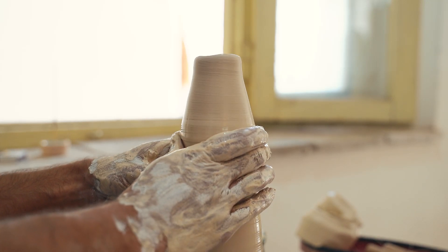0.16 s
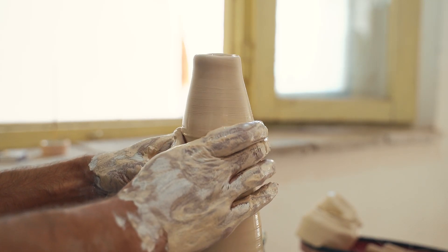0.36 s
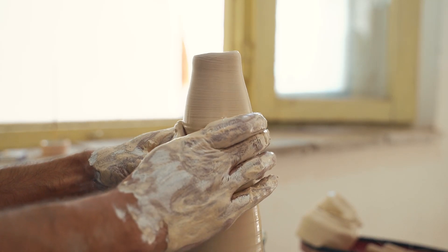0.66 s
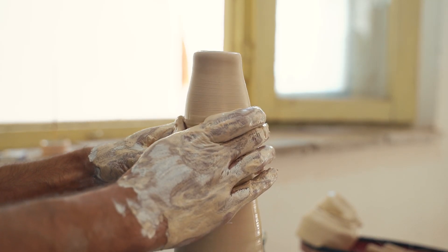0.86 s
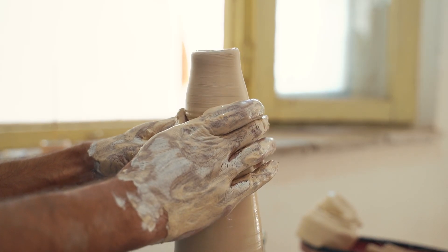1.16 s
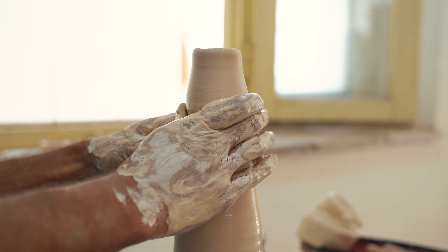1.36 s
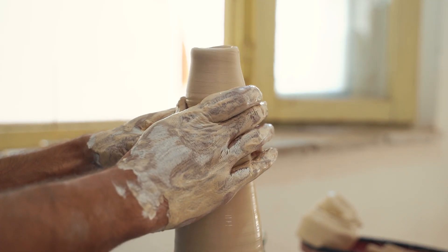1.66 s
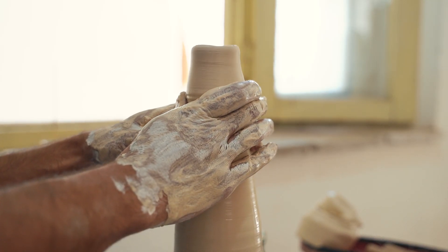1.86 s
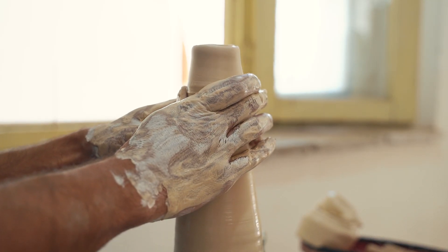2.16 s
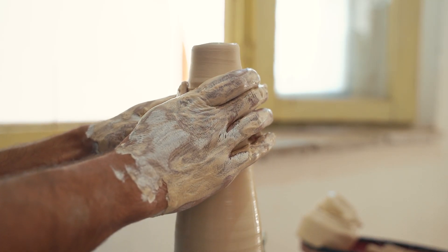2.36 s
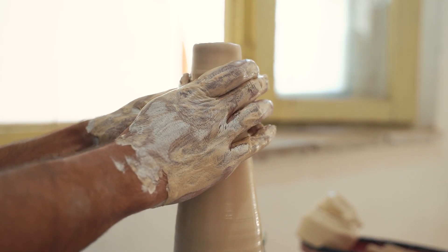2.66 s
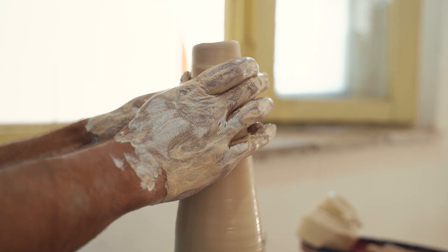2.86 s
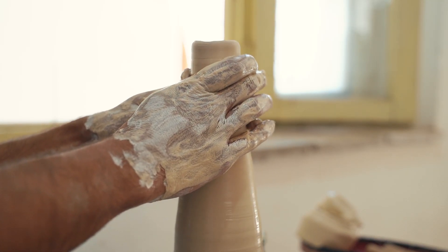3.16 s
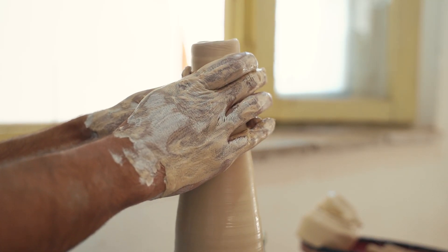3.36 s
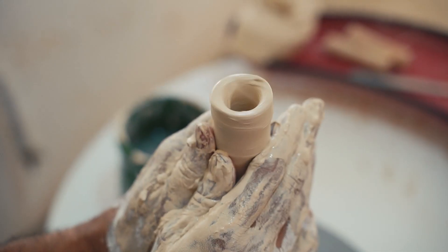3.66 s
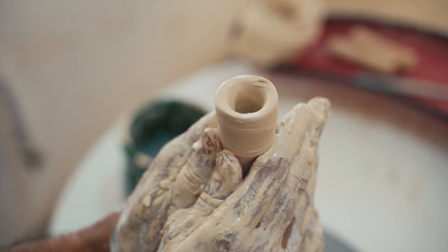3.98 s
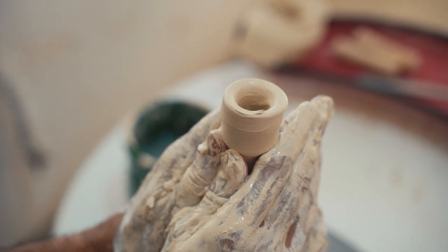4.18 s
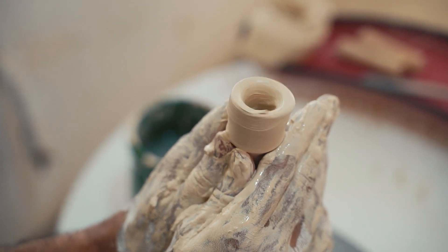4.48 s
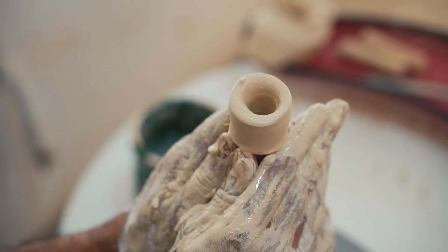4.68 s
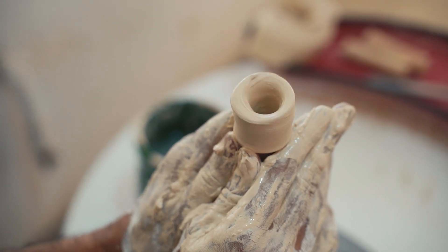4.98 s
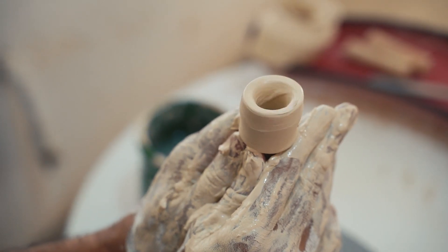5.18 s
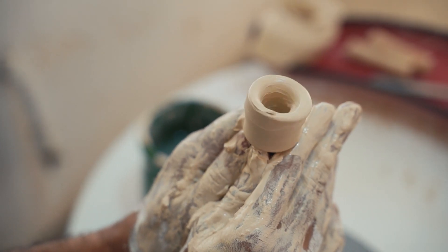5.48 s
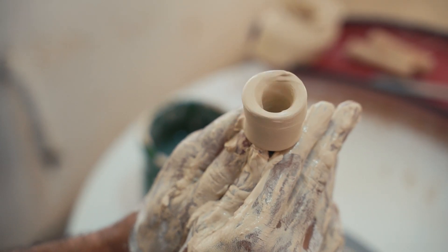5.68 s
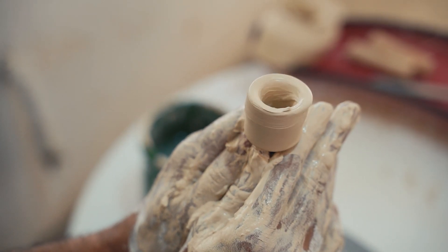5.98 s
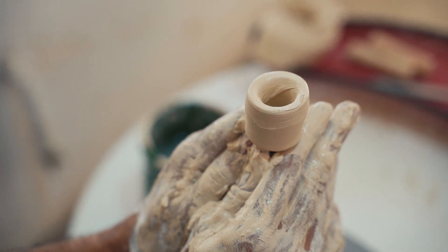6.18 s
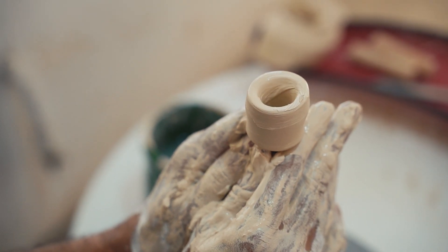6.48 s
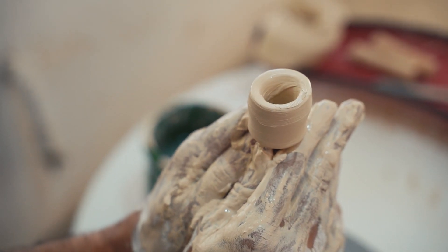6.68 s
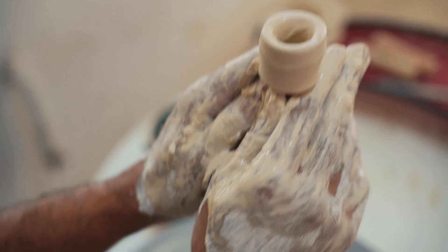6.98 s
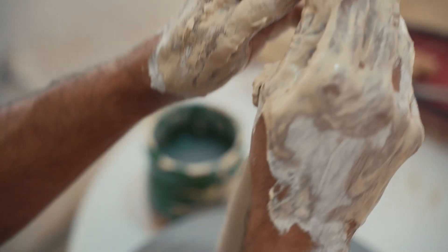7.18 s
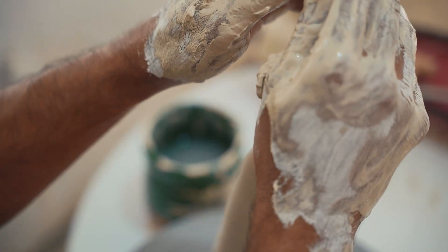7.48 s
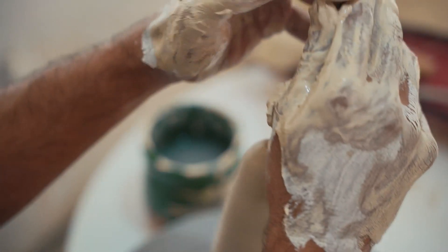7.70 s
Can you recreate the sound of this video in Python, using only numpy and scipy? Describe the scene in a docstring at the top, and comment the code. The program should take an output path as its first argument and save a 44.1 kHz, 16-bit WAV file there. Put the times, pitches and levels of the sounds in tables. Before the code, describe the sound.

A close stereo perspective in a small studio presents an electric pottery wheel running without pause. From 0 to 3 seconds, a low motor hum throbs unevenly over rushing bearings, soft hiss, faint thin whistles and a very high, trembling controller whine. Wet palms brush the clay near 0.25, 0.7 and 1 second; tiny belt chirps occur around 1.15 and 1.4, and soft taps cluster around 1.6 and 2.6. Between 3 and 4 seconds, it dissolves into a faster wheel: the main hum drops lower, bearing noise grows fuller, and a rough mid-pitched belt note rises sharply around 3.5. That note swells and slackens slowly, roughly every 1.3 seconds. A deep, faint drone strengthens near 5.7. Small wet smacks with brief room tails come around 6.2 to 6.8, then hum and whine continue to the end near 7.8.

```python
"""A motor hum fills a small studio as an electric pottery wheel turns under wet hands on clay.
Hums throb through the frame, bearing noise rushes, the belt sings and the speed controller whines near 8 kHz.
A slowly turning wheel dissolves into a faster one, whose hum sits on a lower frame resonance.
Tones are fluttering sines, while rush, hiss, sliding palms, soft taps and wet smacks are shaped noise."""
import sys
import numpy as np
from scipy.fft import rfft, irfft, next_fast_len
from scipy.io import wavfile
from scipy.ndimage import map_coordinates

SR = 44100
rng = np.random.default_rng(int(sys.argv[2]) if len(sys.argv) > 2 else 0)


def wrap_up_sound(samples):
    """Save the sound to the file named by the first command line argument, as 16-bit audio."""
    columns = np.atleast_2d(samples).T
    # keep every value between -1 and 1, then stretch to whole-number steps
    tamed = np.clip(columns, -1, 1)
    steps = np.round(tamed * 32767).astype(np.int16)
    wavfile.write(sys.argv[1], SR, steps)


N = 345744

# Frame hums at slow and fast speed, and the low drone of the stand.
# Each row: time in seconds, level in dB before a small trim.
SLOW_HUM_CURVE = [(0.0, -37.5), (0.09, -30.5), (0.62, -37), (0.67, -45), (0.91, -31.5), (1.39, -33),
                  (1.41, -39.5), (1.65, -29.5), (1.7, -42), (1.88, -27), (2.0, -38.5), (2.1, -30),
                  (2.62, -37), (2.83, -29), (3.14, -46), (3.18, -36), (3.33, -45), (3.37, -36), (3.73, -43),
                  (3.75, -53)]
FAST_HUM_CURVE = [(3.3, -58), (3.62, -39), (3.84, -34), (4.09, -45), (4.55, -33), (4.89, -38), (5.13, -32),
                  (5.19, -48), (5.4, -36), (5.57, -48), (5.83, -33), (6.24, -42.5), (6.36, -35.5),
                  (6.5, -60), (6.66, -38), (7.8, -32)]
DRONE_CURVE = [(0.0, -60), (0.04, -50), (0.41, -46), (1.99, -60), (5.74, -41), (6.62, -52), (6.99, -44),
               (7.71, -59), (7.84, -48)]
SLOW_HUM_HZ, FAST_HUM_HZ, DRONE_HZ = 180, 120, 43.8  # pitches at their usual level
SAG_PER_DB = 0.0046  # share of its pitch a hum loses per dB of swell
HUM_FADE_S = 0.08  # fade in and out, outside the first and last points of the curve

# Weaker tones: motor orders, and a faint hum at 100 and 200 Hz. Each row: pitch in Hz, level in dB (at fast
# speed only the balance counts).
SLOW_MOTOR_TONES = [(57, -68), (85, -54), (100, -54), (114, -54), (171, -45.5), (199, -52), (220, -64),
                    (240, -55), (261, -57), (490, -65.5), (610, -58.5), (661, -56)]
FAST_MOTOR_TONES = [(100, -49.5), (160, -46), (180, -48.5), (200, -41.5), (220, -54.5), (239, -50.5),
                    (259, -49), (268, -53.5), (355, -56.5), (373, -54), (460, -62.5), (483, -57.5),
                    (665, -54), (818, -53), (842, -57.5), (865, -55.5)]
# Swell of the fast motor tones as the hands press. Each row: time in seconds, level in dB before a trim.
HAND_LOAD = [(4.0, -41), (4.55, -38), (4.95, -42), (5.95, -39.5), (6.15, -43), (7.15, -39), (7.5, -36),
             (7.84, -42.5)]

# Colour of the belt and bearing noise. Each row: frequency in Hz, relative density in dB per Hz.
SLOW_RUSH_COLOUR = [(20, -16), (42, -3), (80, -0.5), (150, -1.5), (250, -2), (320, -5.5), (480, -5.5),
                    (540, -7.5), (650, 0), (740, -11), (830, -6), (1150, -16), (3000, -21), (7000, -40.5)]
FAST_RUSH_COLOUR = [(20, -16), (60, -1.5), (140, -2), (260, 0), (320, -6), (490, -4.5), (540, -8),
                    (650, 5.5), (745, -5), (840, 0), (930, -6.5), (1080, -17), (3000, -20.5), (6000, -45)]
SLOW_BEARINGS_DB, FAST_BEARINGS_DB = -43.5, -40.5  # middle levels, about which the noise wavers

# Thin high whistles of the drive. Each row: centre in Hz, width in Hz, level in dB.
SLOW_WHISTLE_BANDS = [(2510, 140, -61), (12000, 110, -73), (12700, 90, -71)]
FAST_WHISTLE_BANDS = [(2220, 130, -64.5), (2500, 116, -59.5), (2744, 40, -69.5), (3160, 90, -67.5),
                      (13250, 140, -72), (15700, 220, -66.5)]

# Colour of the steady hiss. Each row: frequency in Hz, relative density in dB per Hz.
HISS_COLOUR = [(300, -9), (2000, -6.5), (4500, 5), (7000, 1.5), (9300, -5.5), (11000, -0.5), (15000, -4.5),
               (15700, -1.5)]

# Belt chirps as it slips. Each row: centre in seconds, length in seconds, rise in dB.
BELT_CHIRPS = [(1.15, .07, 8), (1.425, .07, 11), (3.99, .09, 4), (6.2, .12, 4)]
TURN_HZ, TIGHT_S = 0.76, 3.78  # the belt's load cycle: its rate, and a moment when it is tightest
BELT_GRIP = 2.1  # how squarely the belt switches between tight and slack
BELT_RISE_S, BELT_RISE_LENGTH_S = 3.52, 0.089  # middle and length of the belt note's rise from faint to loud
BELT_SLOW_DB, BELT_EASE_DB_PER_S = -50, 1.6  # slow belt: level at the start, and how fast it eases off
BELT_FAST_DB, BELT_SWING_DB = -39.8, 3.2  # fast belt: middle level, and swing up or down with tension

# Sidebands of the controller whine. Each row: multiple of the drive frequency off the carrier,
# relative left level in dB, relative right level in dB, left-right likeness from -1 to 1.
SLOW_SIDEBANDS = [(-25, -71, -66, 0.5), (-20, -67, -60, 0.2), (-14, -48, -45, 0.9), (-10, -50, -49, -0.8),
                  (-8, -63, -59, -0.2), (-3, -57, -47, -0.5), (-1, -47, -50, -0.4), (1, -52, -42, 0.8),
                  (3, -52, -51, -0.6), (8, -63, -52, 0.3), (10, -52, -54, 0.5), (14, -50, -52, 0.2),
                  (16, -65, -63, -0.1), (24, -71, -68, 0.2)]
FAST_SIDEBANDS = [(-22, -66, -63, 0.5), (-20, -56, -55, -0.1), (-16, -58, -56, 0.3), (-14, -44, -47, 0.4),
                  (-10, -53, -47, 0.6), (-8, -55, -50, 0.2), (-3, -52, -52, 0.2), (-1, -44, -43, -0.2),
                  (1, -44, -47, -0.4), (3, -52, -50, 0.1), (5, -58, -53, 0.4), (8, -56, -53, -0.1),
                  (10, -47, -44, -0.9), (14, -47, -49, -0.0), (16, -62, -53, 0.1), (23, -67, -61, -0.2)]
# Strength of the whine. Each row: time in seconds, level in dB before a trim.
WHINE_CURVE = [(0.0, -41.5), (1.05, -40.5), (3.36, -42), (3.38, -44.5), (4.11, -37.5), (7.58, -40.5),
               (7.84, -36.5)]
CARRIER_HZ = 8139  # switching frequency of the speed controller
SLOW_HZ, FAST_HZ = 13.87, 19.6  # drive frequency of the motor at each speed

# Wet palms sliding on clay. Each row: centre in seconds, length in seconds, level in dB.
PALM_SLIDES = [(.25, 0.45, -50.5), (0.702, 0.15, -50.5), (1.04, .13, -51.5)]

# Soft taps and wet smacks. Each row: start in seconds, level in dB before a 3 dB lift, ring in Hz.
TAP_EVENTS = [(.259, -44, 3250), (.8, -52, 1500), (1.04, -48, 1050), (1.547, -51.5, 3500),
              (1.604, -42.5, 1860), (1.639, -47, 1200), (1.7, -48, 1190), (2.565, -56, 4600),
              (2.598, -48.5, 1550), (2.639, -51, 1050), (3.115, -53, 5550), (3.51, -54, 4900),
              (3.691, -52, 1300), (6.196, -54, 4500), (6.419, -43.5, 2900), (6.434, -44.5, 2470),
              (6.55, -41, 1600), (6.808, -42, 1600)]
# Colour of a tap about its ring. Each row: distance in octaves, relative level in dB.
TAP_SPECTRUM = [(-6, -19), (-1, 4), (0, 6.5), (1, -5), (1.7, -17.5), (7, -35)]

# Left-right likeness of the noise. Each row: frequency in Hz, likeness from 0 to 1.
STEREO_LIKENESS = [(150, 1), (350, 0.86), (700, 0.65), (1400, 0.28), (3000, 0), (12000, 0.08)]


def amp(db):
    """Decibels to gain."""
    return 10 ** (np.asarray(db) / 20)


def unit(x):
    """Scale to rms 1."""
    return x / np.sqrt(np.mean(np.abs(x) ** 2) + 1e-20)


def clock():
    """Time of every sample in seconds."""
    return np.arange(N) / SR


def along(points, hz):
    """Read (Hz, value) points on a log frequency axis."""
    f, value = np.transpose(points)
    return np.interp(np.log(hz + 1), np.log(f + 1), value)


def curves(rows):
    """One value per sample for each column after the time."""
    s, *columns = np.transpose(rows)
    return [np.interp(clock(), s, column) for column in columns]


def wobble(rate):
    """A smooth random curve with rate knots a second."""
    coarse = clock()[::64]
    knots = rng.standard_normal(2048)
    smooth = map_coordinates(knots, [coarse * rate], mode="wrap")
    return np.interp(clock(), coarse, smooth)


def turning(hz):
    """Phase of a vibration with a fixed or moving frequency, from a random start."""
    return 2 * np.pi * (np.cumsum(hz * np.ones(N)) / SR + rng.random())


def tone(phase, rough, rate):
    """A sine of rms near 1, of which the share rough flutters in level and phase."""
    rough = np.clip(rough, 0, 1)
    steady, loose = np.sqrt(2 * (1 - rough)), np.sqrt(rough)
    in_phase = (steady + loose * wobble(rate)) * np.sin(phase)
    return in_phase + loose * wobble(rate) * np.cos(phase)


def filtered(x, response):
    """Shape the spectrum of x by a response of frequency."""
    m = next_fast_len(N + 8192, real=True)
    spectrum = rfft(x, m) * response(np.fft.rfftfreq(m, 1 / SR))
    return irfft(spectrum, m)[..., :N]


def noise(gain):
    """Coloured stereo noise of rms 1: mono in the bass, diffuse in the treble."""
    def mid_side_gain(hz):
        # this split of power between mid and side gives the wanted likeness
        angle = np.arccos(np.clip(along(STEREO_LIKENESS, hz), -1, 1)) / 2
        return gain(hz) * [np.cos(angle), np.sin(angle)]

    mid, side = filtered(rng.standard_normal((2, N)), mid_side_gain)
    return unit(np.array([mid + side, mid - side]))


def rush(spectrum):
    """Stereo noise of rms 1 with a (Hz, dB) spectrum."""
    return noise(lambda hz: amp(along(spectrum, hz)))


def frame_hum(rows, hz, gain_db, wander_hz, throb_db, rough, flutter_rate):
    """A motor order on a frame resonance throbs, and sags in pitch as it swells."""
    db, = curves(rows)
    from_edge = np.minimum(clock() - rows[0][0], rows[-1][0] - clock())
    present = np.clip(1 + from_edge / HUM_FADE_S, 0, 1)
    usual_db = np.average(db, weights=present * amp(db) ** 2)
    db = db + throb_db * wobble(11)
    pitch = hz * (1 - SAG_PER_DB * (db - usual_db)) + wander_hz * wobble(4)
    return present * amp(db + gain_db) * tone(turning(pitch), rough, flutter_rate)


def slow_wheel():
    """Bearing noise, motor tones, whistles and hiss at slow speed."""
    bearings = amp(SLOW_BEARINGS_DB + 1.4 * wobble(7.78)) * rush(SLOW_RUSH_COLOUR)
    tones = motor_tones(SLOW_MOTOR_TONES, rough=0.67, flutter_rate=12)
    hiss = amp(-54.5) * rush(HISS_COLOUR)
    return bearings + tones + whistles(SLOW_WHISTLE_BANDS) + hiss


def fast_wheel():
    """The same parts at fast speed; the motor tones swell with the pressure of the hands."""
    tones_db, = curves(HAND_LOAD)
    bearings = amp(FAST_BEARINGS_DB + 1.1 * wobble(12)) * rush(FAST_RUSH_COLOUR)
    tones = unit(motor_tones(FAST_MOTOR_TONES, rough=0.28, flutter_rate=8))
    tones = amp(tones_db + 0.96 + 0.7 * wobble(6)) * tones
    hiss = amp(-54) * rush(HISS_COLOUR)
    return bearings + tones + whistles(FAST_WHISTLE_BANDS) + hiss


def motor_tones(tones, rough, flutter_rate):
    """Weak tones whose pitches waver together as the hands load the wheel."""
    load = np.cumsum(1 + 0.0029 * wobble(5)) / SR  # time that runs slightly fast or slow
    return sum(amp(db) * tone(2 * np.pi * hz * load, rough, flutter_rate) for hz, db in tones)


def whistles(bands):
    """Noise in narrow resonances, fluttering together in level."""
    def resonances(f):
        return sum(amp(db) / np.sqrt(width) / (1 + (2 * (f - hz) / width) ** 2) for hz, width, db in bands)

    level = np.linalg.norm([amp(db) for hz, width, db in bands])
    flutter = amp(1.1 * wobble(8.1) + 1.7 * wobble(35))
    return level * flutter * noise(resonances)


def belt(hz, rough, flutter_rate, unrest_db):
    """The belt sings a rough note: faint with the slow wheel, louder and swelling with tension with the fast."""
    loud = np.clip(0.5 + (clock() - BELT_RISE_S) / BELT_RISE_LENGTH_S, 0, 1)
    slow_db = BELT_SLOW_DB - BELT_EASE_DB_PER_S * clock()
    fast_db = BELT_FAST_DB + BELT_SWING_DB * tension()
    slip_db = sum(rise * np.exp(-(2 * (clock() - s) / length) ** 2) for s, length, rise in BELT_CHIRPS)
    db = (1 - loud) * slow_db + loud * fast_db + slip_db + unrest_db * wobble(14)
    phase = turning(hz + 2.546 * wobble(8))
    # a fully fluttering copy in each ear widens the note
    spread = np.array([tone(phase, 1, flutter_rate), tone(phase, 1, flutter_rate)])
    return amp(db) * (tone(phase, rough, flutter_rate) + amp(-13.5) * spread)


def tension():
    """The belt tightens (towards 1) and slackens (towards -1) in a slow, even cycle."""
    return np.tanh(BELT_GRIP * np.cos(2 * np.pi * TURN_HZ * (clock() - TIGHT_S)))


def controller(fast):
    """The whine spreads wider at the higher drive frequency, and trembles slightly in level."""
    slow_whine = whine(SLOW_HZ, SLOW_SIDEBANDS, rough=0.12, flutter_rate=24, halo_db=-51, halo_width_hz=290)
    fast_whine = whine(FAST_HZ, FAST_SIDEBANDS, rough=0.2, flutter_rate=22, halo_db=-46, halo_width_hz=380)
    db, = curves(WHINE_CURVE)
    # the divisor keeps the power even through the crossfade
    blend = ((1 - fast) * slow_whine + fast * fast_whine) / np.hypot(1 - fast, fast)
    return amp(db + 2.2 + 0.4 * wobble(30)) * blend


def whine(speed_hz, sidebands, rough, flutter_rate, halo_db, halo_width_hz):
    """The drive frequency splits the switching carrier into sidebands; each ear hears its own mix."""
    drive = turning(speed_hz * (1 + 0.0127 * wobble(9)))
    carrier = turning(CARRIER_HZ)
    # the casing rings with the jitter of the switching in a steep-sided band
    out = amp(halo_db) * noise(lambda hz: 1 / np.sqrt(1 + (np.abs(hz - CARRIER_HZ) / halo_width_hz) ** 9))
    for multiple, left_db, right_db, likeness in sidebands:
        phase = carrier + multiple * drive + 2 * np.pi * rng.random()
        lag = np.arccos(np.clip(likeness, -1, 1)) * rng.choice([-1, 1])
        left = amp(left_db) * tone(phase, rough, flutter_rate)
        right = amp(right_db) * tone(phase + lag, rough, flutter_rate)
        out += [left, right]
    return unit(out)


def clay():
    """Wet palms hiss along the clay as bright, finely fluttering noise."""
    strokes = sum(amp(db) * np.exp(-(2 * (clock() - s) / length) ** 2) for s, length, db in PALM_SLIDES)
    film = rush([(1000, -5), (4000, 0), (11000, 1.5), (15500, -4)]) * amp(1.3 * wobble(120))
    return strokes * film


def taps(t60, room_db, room_t60, ring_share):
    """Each tap is a short noise burst about one resonance, with a stereo tail from the room."""
    out = np.zeros((2, N + SR))
    t = np.arange(SR // 2) / SR
    hz = np.fft.rfftfreq(len(t), 1 / SR)
    attack = 1 - np.exp(-t / 0.00053)
    for s, db, ring_hz in TAP_EVENTS:
        octaves = np.log2((hz + 1) / ring_hz)
        ring = ring_share / (1 + (octaves / 0.02) ** 2)
        colour = amp(np.interp(octaves, *np.transpose(TAP_SPECTRUM))) + ring
        burst, *echo = unit(irfft(rfft(rng.standard_normal((3, len(t)))) * colour))
        # the walls swallow high taps sooner than low ones; room_t60 holds for a 2 kHz ring
        tail = amp(room_db - 60 * t / room_t60 * np.sqrt(ring_hz / 2000)) * np.array(echo)
        tap = amp(db + 3) * (amp(-60 * t / t60) * burst + tail) * attack
        out[:, round(s * SR):][:, :len(t)] += tap
    return out[:, :N]


def scene():
    """The slow wheel dissolves into the fast one beneath hums, belt and hands."""
    fast, = curves([(3.0, 0), (4.0, 1)])
    slow_hum = frame_hum(SLOW_HUM_CURVE, SLOW_HUM_HZ, gain_db=0.24, wander_hz=0.6, throb_db=1.9,
                         rough=0.02, flutter_rate=30)
    fast_hum = frame_hum(FAST_HUM_CURVE, FAST_HUM_HZ, gain_db=0.2, wander_hz=0.5, throb_db=0.7,
                         rough=0.03, flutter_rate=24)
    drone = frame_hum(DRONE_CURVE, DRONE_HZ, gain_db=-0.4, wander_hz=0.35, throb_db=0.7,
                      rough=0.08, flutter_rate=13)
    wheel = (1 - fast) * slow_wheel() + fast * fast_wheel()
    belt_note = belt(hz=622, rough=0.19, flutter_rate=22, unrest_db=1.6)
    hands = clay() + taps(t60=0.082, room_db=-6.5, room_t60=0.69, ring_share=0.9)
    return slow_hum + fast_hum + drone + wheel + belt_note + controller(fast) + hands


def record(dry):
    """Nothing is kept above a sharp band limit of 15750 Hz."""
    return filtered(dry, lambda hz: hz < 15750)


dry = scene()
out = record(dry)
wrap_up_sound(out)
```